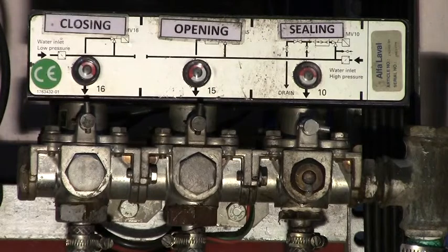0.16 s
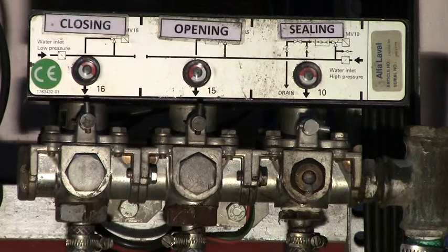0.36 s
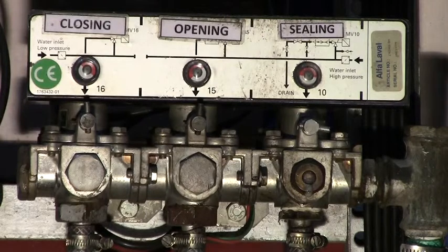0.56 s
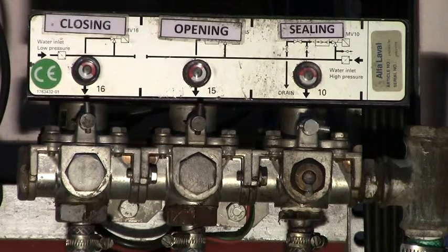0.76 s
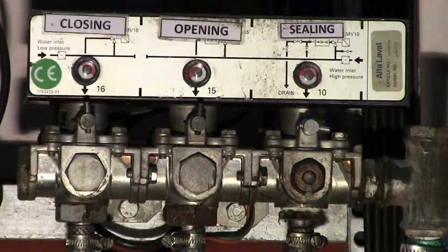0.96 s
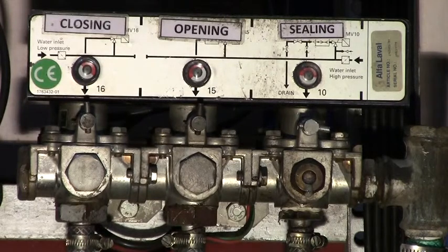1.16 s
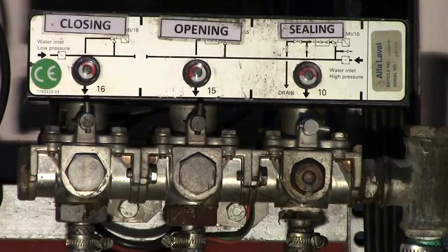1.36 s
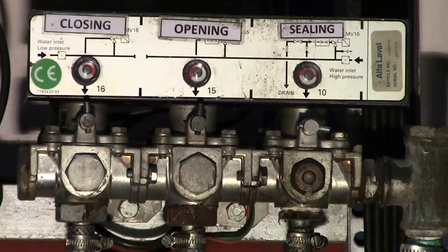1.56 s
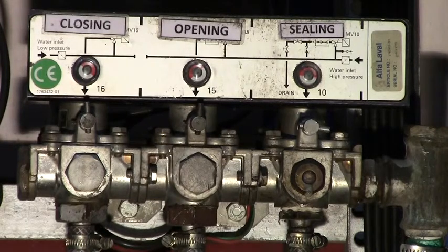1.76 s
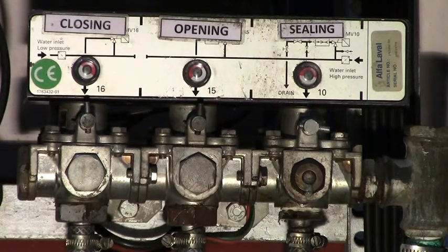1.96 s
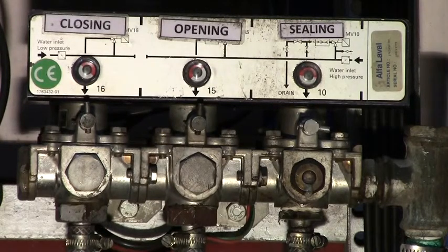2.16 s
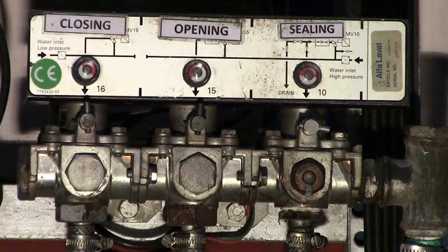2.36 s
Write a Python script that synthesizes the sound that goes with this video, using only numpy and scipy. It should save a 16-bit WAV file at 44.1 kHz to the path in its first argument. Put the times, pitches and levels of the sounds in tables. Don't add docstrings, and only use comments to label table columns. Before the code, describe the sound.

Steady loud machine drone throughout: low and midrange whirring tones, a held pump note and dense hissing roar ringing through metal casing and pipes, picked up close by a nearly mono stereo microphone in a workshop.

```python
import sys
import numpy as np
from scipy import signal
from scipy.fft import rfft, irfft
from scipy.io import wavfile
from scipy.ndimage import uniform_filter1d

SR = 44100
rng = np.random.default_rng(int(sys.argv[2]) if len(sys.argv) > 2 else 0)


def linear_from_db(decibels):
    return 10 ** (np.asarray(decibels, float) / 20)


def to_wav(sig):
    pcm = np.clip(np.atleast_2d(sig), -1, 1) * 32767
    pcm = np.round(pcm).astype(np.int16)
    wavfile.write(sys.argv[1], SR, pcm.T)


N = 110691

# [multiple of bowl turn, rms level/dB]
BOWL_ORDERS = [(1, -28.8), (2, -37.7), (3, -30.8), (4, -42.8), (5, -30.6), (6, -38.1), (7, -26.0),
               (8, -41.6), (9, -40.4), (10, -32.4), (11, -27.0), (12, -26.6), (13, -33.9), (14, -30.7),
               (15, -43.2), (16, -37.1), (17, -40.5), (18, -32.3), (19, -45.0), (20, -40.3), (21, -43.0),
               (22, -41.6), (24, -42.7), (26, -38.4), (33, -45.2), (46, -48.4), (50, -49.7)]
# [multiple of motor turn, rms level/dB]
MOTOR_ORDERS = [(10, -42), (12, -34.8), (13, -46.7), (15, -40.1), (16, -43.6), (20, -47.5), (24, -35.5),
                (27, -40.8), (30, -43.7), (34, -42.2), (37, -39.1), (44, -44.6)]
# [f/Hz, level/dB per Hz]
ROAR_COLOUR = [(25, -18.5), (70, -4.5), (180, -8.5), (300, -6), (1200, -2), (3300, -3.5), (4600, -8),
               (8000, -8.5), (15500, -19.5)]
# [f/Hz, width/Hz, gain/dB]
FRAME_RINGS = [(238, 70, 10), (387, 90, 3), (520, 35, 4.5), (624, 20, 6.5), (682, 50, 3.5), (770, 29, 12),
               (865, 19, 6), (970, 23, 0), (995, 60, -1.5)]
# [f/Hz, width/Hz, gain/dB]
HOOD_RINGS = [(1060, 16, 5.5), (1240, 36, 8.6), (1302, 51, 6.5), (1476, 51, 2.5), (1487, 28, 9),
              (1607, 74, 9), (1750, 22, 2.5), (1823, 30, 8.2), (1885, 70, 9.5), (1965, 25, 3),
              (2055, 43, 2.3), (2165, 130, 6.5), (2280, 27, -6.5), (2200, 22, 10)]
# [f/Hz, width/Hz, gain/dB]
PIPE_RINGS = [(2495, 60, 7), (2608, 29, 6), (2680, 51, 4.5), (2787, 80, 5.5), (2850, 30, 3), (2916, 67, 6),
              (3060, 110, 8.5), (3200, 57, 4.5), (3290, 40, 3), (3347, 93, 7.5), (3600, 74, 3.5),
              (3780, 110, 5.5), (3989, 102, 5), (4388, 117, 3)]
# [f/Hz, width/Hz, gain/dB]
COVER_RINGS = [(4500, 67, -4), (6520, 350, 2), (7660, 250, 4), (8020, 91, 4), (8340, 150, 3.5),
               (8940, 140, -1.5), (9400, 240, 0), (11156, 420, 0), (12700, 280, 3), (14200, 1500, 2),
               (15494, 296, 3)]
# [f/Hz, level/dB]
UNSHARED = [(30, -17), (130, -28.5), (400, -21.5), (750, -20.5), (1300, -30.5), (6500, -20.5),
            (9000, -12.5), (15000, -7)]
# [f/Hz, left over right level/dB]
LEFT_LEAN = [(4000, 0), (8100, .8), (11000, 1.6), (15000, 1.9)]
# [t/s, level/dB]
DRAUGHT_LEVEL = [
    (0, -41),
    (.4, -35),
    (.55, -51),
    (.7, -30),
    (.95, -55),
    (1.1, -70),
    (2.5, -70),
]
# [f/Hz, level/dB per Hz]
DRAUGHT_COLOUR = [(20, -8), (70, 0), (150, -7), (300, -19), (600, -45)]


def evened(x):
    return x / np.sqrt(np.mean(x ** 2) + 1e-20)


def read_curve(points, hz):
    f, value = np.transpose(points)
    return np.interp(np.log(hz + 1), np.log(f + 1), value)


def drift(rate_hz, t):
    phases = rng.random(16)
    rates = rate_hz * np.geomspace(0.08, 1, 16)
    return evened(sum(np.sin(2 * np.pi * (f * t + p)) / np.sqrt(f) for f, p in zip(rates, phases)))


def shaft(turn_hz, orders):
    waver_db, waver_hz, slip_rad = 1.0, 3.89, 0.0097
    spread_turns = 0.235
    t = np.arange(N) / SR
    coarse = np.arange(0, N / SR + 0.02, 0.01)
    angle = 2 * np.pi * turn_hz * t + slip_rad * np.interp(t, coarse, drift(waver_hz, coarse))
    out = np.zeros(N)
    for multiple, db in orders:
        order = round(multiple)
        depth_db = waver_db * min(order / 6, 1)
        waver = depth_db * np.interp(t, coarse, drift(waver_hz, coarse))
        phase = 2 * np.pi * spread_turns * order ** 2
        out += np.sqrt(2) * linear_from_db(db + waver) * np.sin(order * angle + phase)
    return out


def bowl():
    return shaft(113.3, BOWL_ORDERS)


def motor():
    return shaft(24.21, MOTOR_ORDERS)


def pump():
    return shaft(347.3, [(1, -37)])


def machine_colour(hz):
    rings = np.zeros(len(hz))
    for part in (FRAME_RINGS, HOOD_RINGS, PIPE_RINGS, COVER_RINGS):
        for f, width, db in part:
            rings += db * np.exp(-0.5 * ((hz - f) / (width / 2.67)) ** 2)
    ripple_db, ripple_hz = 1.3, 30.0
    span = max(round(ripple_hz * N / SR), 1)
    ripple = uniform_filter1d(rng.standard_normal(len(hz)), span)
    ripple = evened(uniform_filter1d(ripple, span))
    treble = np.clip(hz / 2500 - 1, 0, 1)
    return linear_from_db(read_curve(ROAR_COLOUR, hz) + rings + ripple_db * ripple * treble)


def unsteady(x):
    swell_db, patch_db, flicker_db = 0.27, 0.43, 0.36
    f, t, z = signal.stft(x, SR, nperseg=256)
    patches = uniform_filter1d(rng.standard_normal(z.shape[1:]), size=5, axis=0)
    patches = evened(uniform_filter1d(patches, size=24, axis=1))
    flicker = evened(uniform_filter1d(rng.standard_normal(len(t)), size=4))
    flicker = flicker * np.clip(f / 6000, 0, 1)[:, None]
    z = z * linear_from_db(swell_db * drift(2.57, t) + patch_db * patches + flicker_db * flicker)
    return signal.istft(z, SR, nperseg=256)[1][:, :N]


def roar():
    hz = np.fft.rfftfreq(N, 1 / SR)
    shared, apart = rfft(rng.standard_normal((2, N))) * machine_colour(hz)
    apart = apart * linear_from_db(read_curve(UNSHARED, hz))
    lean = linear_from_db(read_curve(LEFT_LEAN, hz) / 2)
    ports = irfft(np.array([(shared + apart) * lean, (shared - apart) / lean]), N)
    return linear_from_db(-15.5) * evened(unsteady(ports))


def draught():
    colour = linear_from_db(read_curve(DRAUGHT_COLOUR, np.fft.rfftfreq(N, 1 / SR)))
    push = evened(irfft(rfft(rng.standard_normal(N)) * colour, N))
    level = linear_from_db(np.interp(np.arange(N) / SR, *np.transpose(DRAUGHT_LEVEL)))
    return push * level * np.array([[1], [-1]])


def scene():
    lines = bowl() + motor() + pump()
    return lines + roar() + draught()


def top_cut(x):
    return signal.sosfilt(signal.butter(12, 15735, fs=SR, output="sos"), x)


def record(dry):
    return top_cut(dry)


dry = scene()
out = record(dry)
to_wav(out)
```